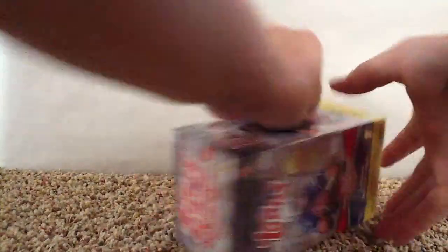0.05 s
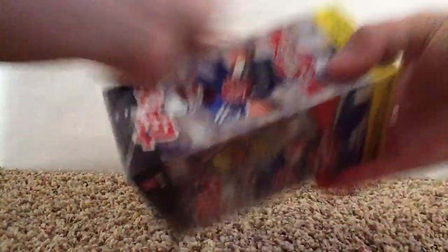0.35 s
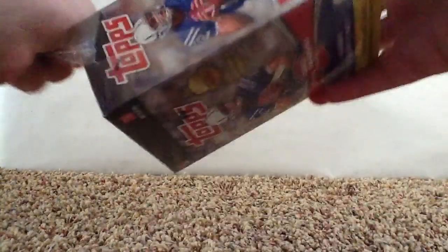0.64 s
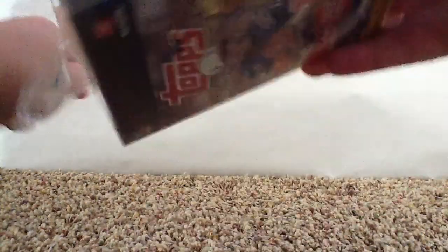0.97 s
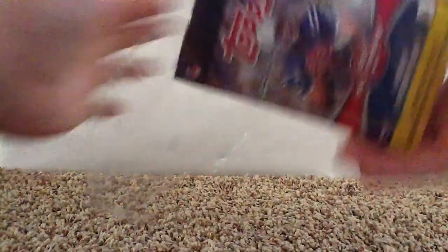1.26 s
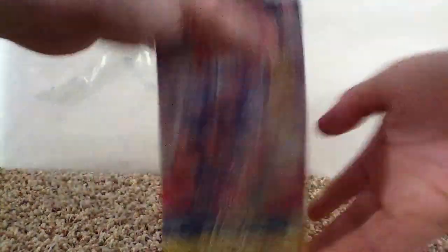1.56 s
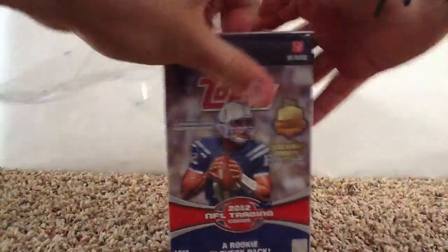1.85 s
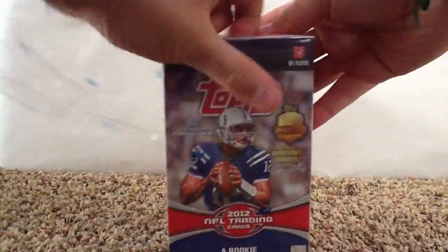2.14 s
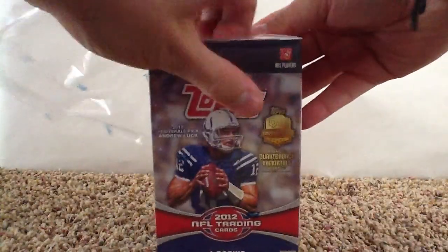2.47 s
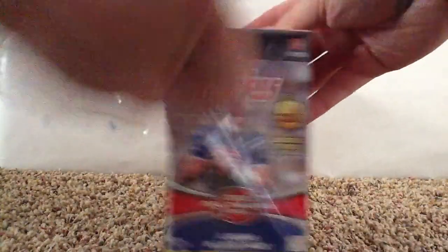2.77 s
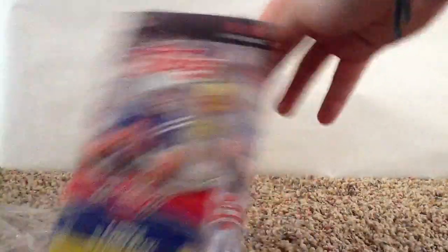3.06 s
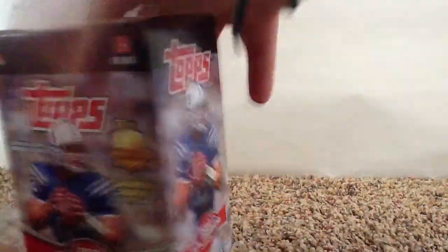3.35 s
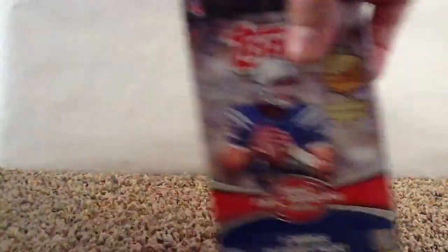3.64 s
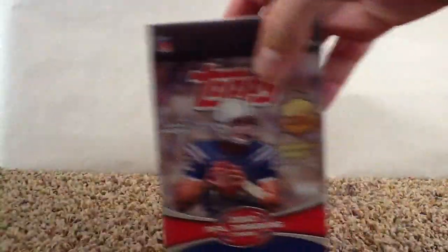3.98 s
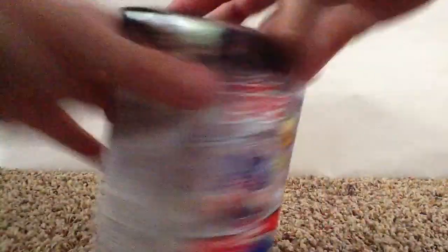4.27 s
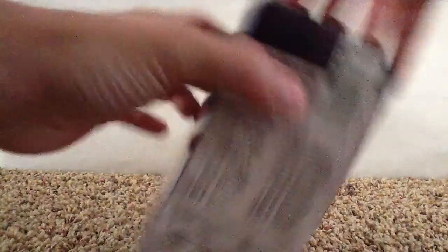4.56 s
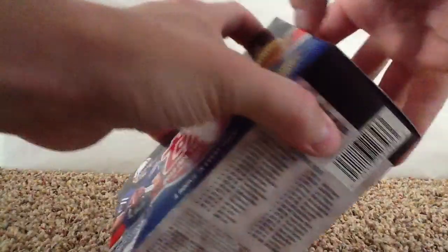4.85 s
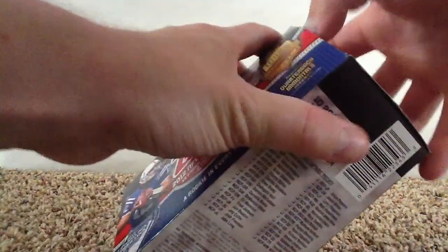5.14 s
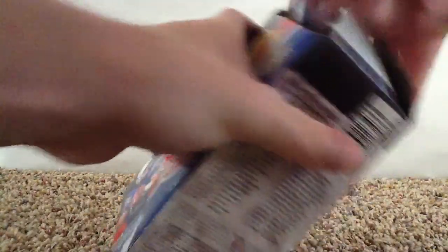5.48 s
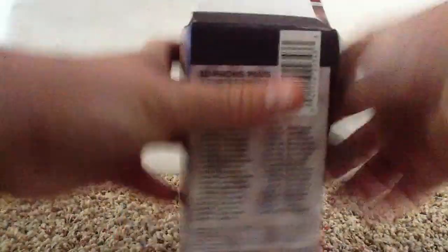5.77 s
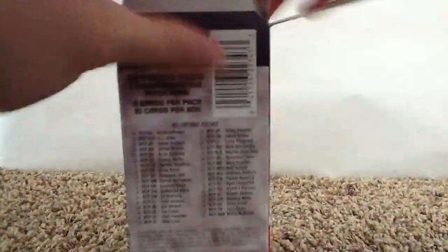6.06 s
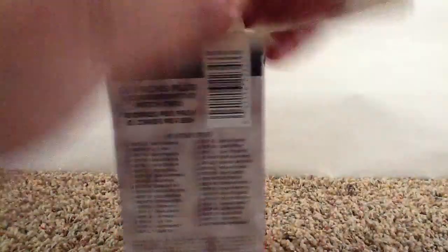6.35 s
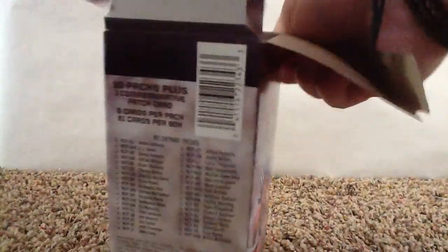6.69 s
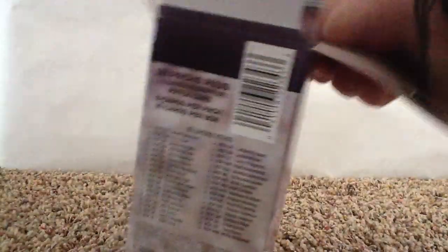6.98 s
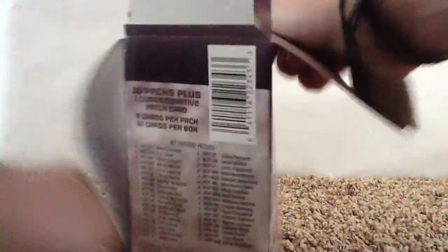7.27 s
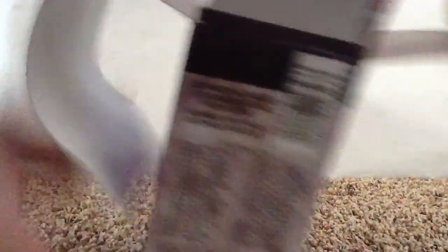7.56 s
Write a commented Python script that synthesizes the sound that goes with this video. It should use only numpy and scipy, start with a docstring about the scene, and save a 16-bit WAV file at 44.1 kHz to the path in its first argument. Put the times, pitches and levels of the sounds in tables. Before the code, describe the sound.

In a quiet carpeted room, thin plastic wrap crackles and snaps right beside the microphone as it is stripped from a box and crumpled, with fingers bumping the hollow sides. The second half changes to dry cardboard sounds: rasping scrapes, small creaks, taps and a few sharp, short rips as the lid is worked open. A faint low room rumble lies underneath.

```python
"""Shrink wrap snaps and crinkles right at a small microphone as hands strip it from a box of card packs.
From about four seconds on they pry and tear the lid open: fingers and flaps scrape and creak on the card.
The film sounds as its facets buckle, the card as it sticks and slips; tugs and taps knock the hollow box.
Behind it all, a small carpeted room answers faintly over its own low rumble."""
import sys
import numpy as np
from scipy import signal
from scipy.fft import rfft, irfft
from scipy.io import wavfile
from scipy.ndimage import uniform_filter1d

SR = 44100
rng = np.random.default_rng(int(sys.argv[2]) if len(sys.argv) > 2 else 0)


def wav_record(signal):
    """Record a signal, one row per channel, as 16-bit PCM in the file named by sys.argv[1]."""
    frames = np.transpose(np.atleast_2d(signal))
    bounded = np.clip(frames, -1, 1)
    # unit amplitude maps onto the largest positive 16-bit level
    quanta = np.round(bounded * 32767).astype(np.int16)
    wavfile.write(sys.argv[1], SR, quanta)


N = 336042
TIME = np.arange(N) / SR
MILLISECOND = SR / 1000  # in samples


def amp(db):
    """Decibels to gain."""
    return 10 ** (np.asarray(db) / 20)


def unit_rms(x):
    """Scales to rms 1."""
    return x / np.sqrt(np.mean(x ** 2) + 1e-20)


def unit_energy(x):
    """Scales to energy 1."""
    return x / np.sqrt(np.sum(x ** 2) + 1e-20)


def curve_at(points, hz):
    """Reads (Hz, value) points on a log-frequency axis."""
    point_hz, value = np.transpose(points)
    return np.interp(np.log(hz + 1), np.log(point_hz + 1), value)


def coloured(x, spectrum):
    """Filters a sound by a curve of (Hz, dB) points."""
    hz = np.fft.rfftfreq(len(x), 1 / SR)
    return irfft(rfft(x) * amp(curve_at(spectrum, hz)), len(x))


def cut(x, hz, side, order=2):
    """Causal low-pass or high-pass."""
    return signal.sosfilt(signal.butter(order, min(hz, SR / 2 - 10), side, fs=SR, output="sos"), x)


def add(mix, start_s, sound):
    """Lays a sound into the mix at a time."""
    part = mix[max(round(start_s * SR), 0):][:len(sound)]
    part += sound[:len(part)]


def room_tone(level_db=-55):
    """The room's steady low rumble, far behind the hands."""
    # Each row: frequency in Hz, relative level in dB.
    tone_spectrum = [(65, -43), (110, -8.5), (170, -0.5), (235, 2), (340, -5.5), (600, -21.5), (1300, -20),
                     (3000, -22.5), (8000, -26.5), (15500, -30)]
    return amp(level_db) * unit_rms(coloured(rng.standard_normal(N), tone_spectrum))


def room_reflections(x, delay_s=0.012, wet_db=-15, dull_hz=4200, taps_per_s=3000):
    """Sparse reflections from nearby walls and furniture, each band dying at its own speed."""
    # The room's decay. Each row: frequency in Hz, seconds to fall 60 dB.
    decay_times = [(150, 0.27), (500, 0.13), (1500, 0.1), (4000, 0.24), (12000, 0.13)]
    taps = rng.choice([-1., 1.], SR // 2) * (rng.random(SR // 2) < taps_per_s / SR)
    hz, t, bands = signal.stft(taps, SR, nperseg=256)
    decay = np.exp(-np.log(1000) * t / curve_at(decay_times, hz)[:, None])
    tail = signal.istft(bands * decay, SR, nperseg=256)[1]
    out = np.zeros(N)
    add(out, delay_s, signal.oaconvolve(x, cut(unit_energy(tail), dull_hz, "low", order=1)))
    return amp(wet_db) * out


def slips(per_s, spread_db):
    """A random train of tiny stick-slip releases; a positive spread makes a few much larger."""
    size = amp(spread_db * np.minimum(rng.exponential(1, N), 3.5))
    return size * rng.choice([-1, 1], N) * (rng.random(N) < per_s / SR)


def resonate(x, hz, width_hz):
    """A resonance that follows a pitch curve."""
    turn = np.exp(2j * np.pi * np.cumsum(hz) / SR)
    pole = np.exp(-np.pi * width_hz / SR)
    return 2 * (turn * signal.lfilter([1 - pole], [1, -pole], x / turn)).real


def card_creaks(sharpness=3.9, hiss_db=-6, settle_s=0.15, sag=0.12, edge_s=0.012, fade_db=-4):
    """Skin or a flap sticks and slips on glossy card: short creaks sag, long ones hold a thin note."""
    # Each row: start in seconds, length in seconds, the card's resonance in Hz, level in dB.
    creak_events = [(0.363, 0.0098, 1680, -34), (1.48, 0.1, 3550, -58), (3.967, 0.29, 3260, -56),
                    (3.976, 0.13, 3970, -60), (3.898, 0.49, 2370, -63.5), (5.411, 0.055, 606, -39.5),
                    (5.466, 0.072, 703, -36.5), (5.675, 0.026, 910, -42.5), (5.69, 0.046, 670, -37),
                    (5.775, 0.019, 2960, -32.5), (6.395, 0.028, 340, -39), (6.462, 0.014, 2920, -42.5),
                    (6.623, 0.23, 7000, -61), (6.783, 0.014, 2130, -37.5), (6.842, 0.016, 3600, -39),
                    (7.267, 0.031, 1720, -43), (7.341, 0.025, 1710, -40.5), (7.545, 0.015, 6240, -43.5)]
    out = np.zeros(N)
    drive = unit_rms(slips(per_s=1500, spread_db=-3.5)) + amp(hiss_db) * rng.standard_normal(N)
    for start, length, hz, db in creak_events:
        ring = drive[round(start * SR):][:round(length * SR)]
        t = TIME[:len(ring)]
        pitch = hz * (1 + sag * np.exp(-length / settle_s) * (0.5 - t / length))
        for _ in range(2):
            ring = resonate(ring, pitch, width_hz=hz / sharpness / (1 + length / settle_s))
        pressure = np.clip(np.minimum(t, length - t) / edge_s, 0, 1) * amp(fade_db * t / length)
        add(out, start, amp(db) * unit_rms(ring * pressure))
    return out


def box_ring(centre_hz, spill_db, octaves=0.62, grip_detune=0.042):
    """A blow rings the box's modes near its centre and spills into the rest; the grip detunes them."""
    # Panels and air space. Each row: frequency in Hz, relative level in dB, seconds to fall 60 dB.
    box_modes = [(141.5, -6, 0.15), (178, -2.5, 0.064), (222, -5.5, 0.1), (270.5, -3, 0.05),
                 (331, -2.5, 0.04), (467.4, -3, 0.039), (565, 3.5, 0.019), (716, -1.5, 0.028),
                 (808, 1, 0.028), (932, 3, 0.023), (1430, 9, 0.0086), (1620, 6.5, 0.0096), (1907, 13, 0.01)]
    hz, db, t60 = np.transpose(box_modes)[:, :, None]
    t = np.arange(4096) / SR
    hz = hz * np.exp(grip_detune * rng.standard_normal(hz.shape))
    reach = 1 / (1 + (np.log2(hz / centre_hz) / octaves) ** 4) + amp(spill_db)
    weight = amp(db) * reach * rng.choice([-1, 1], hz.shape)
    modes = weight * np.sin(2 * np.pi * hz * t) * np.exp(-np.log(1000) * t / t60)
    return unit_energy(modes.sum(0))


def crease(hz, flutter_db=-2, flutter_s=0.0053, bounce_s=0.0023, bounce_gain=0.78):
    """One facet flips: a few cycles of ringing, a flutter of the sheet, a bounce off the box."""
    t = np.arange(512) / SR
    cycles = rng.uniform(0.3, 0.8)
    flip = np.sin(2 * np.pi * hz * t) * t * np.exp(-t * hz / cycles)
    sheet = cut(cut(rng.standard_normal(len(t)), 0.11 * hz, "high"), 1.56 * hz, "low", order=1)
    sound = unit_energy(flip) + amp(flutter_db) * unit_energy(sheet * np.exp(-t / flutter_s))
    bounce = np.interp(t - bounce_s * rng.uniform(0.6, 1.4), t, sound, left=0)
    return unit_energy(sound + bounce_gain * bounce)


def flexing(x, depth_db, size=5):
    """A bending sheet shifts its resonances, in patches about 400 Hz wide and 30 ms long."""
    bands = signal.stft(x, SR, nperseg=512)[2]
    patches = uniform_filter1d(rng.standard_normal(bands.shape), size, axis=0)
    patches = uniform_filter1d(patches, size, axis=1)
    return signal.istft(bands * amp(depth_db * unit_rms(patches)), SR, nperseg=512)[1][:N]


def stroke_gain(strokes, levels_db, rest_db, attack_share, sag_db, release_s):
    """Each stroke rises, sags to its level while the hand moves, then dies away to the resting grip."""
    held = (TIME >= strokes[0][0]) & (TIME <= strokes[-1][0] + strokes[-1][1])
    power = amp(rest_db) ** 2 * held
    for (start, length, *_), db in zip(strokes, levels_db):
        t = TIME[round(start * SR):][:round(length * SR) + SR // 4] - start
        progress = np.clip(t / length, 0, 1)
        rise = np.minimum(progress / attack_share, 1)
        fall = np.exp(-np.maximum(t - length, 0) / release_s)
        add(power, start, (rise * fall * amp(db + sag_db * (1 - progress))) ** 2)
    return np.sqrt(power)


def friction(strokes, spectrum, slips_per_s, spread_db, hiss_db, clump_db, grip_db,
             bumps_per_s, lowest_hz, rumble_trim_db, grip_rumble_db,
             split_hz=4500, skin_hz=1100, pitches=12, **shape):
    """Slips on a moving surface tick in many pitches over a hiss, while soft fingers bump the box."""
    level_db, treble_db, rumble_db = np.transpose(strokes)[2:]
    ticks, bumps = np.zeros(N), np.zeros(N)
    for tick_hz, box_hz in zip(np.geomspace(2500, 12000, pitches), np.geomspace(lowest_hz, 900, pitches)):
        releases = slips(slips_per_s / pitches, spread_db)
        ticks += signal.oaconvolve(releases, crease(tick_hz, flutter_db=1, flutter_s=0.0007))[:N]
        nudges = slips(bumps_per_s / pitches, spread_db=3.5)
        bumps += signal.oaconvolve(nudges, box_ring(box_hz, spill_db=-26))[:N]
    # the grip catches and lets go, so the slips come in clumps
    clumps = amp(clump_db * unit_rms(cut(rng.standard_normal(N), 55, "low")))
    surface = clumps * coloured(unit_rms(ticks) + amp(hiss_db) * rng.standard_normal(N), spectrum)
    dull = unit_rms(flexing(cut(surface, split_hz, "low", order=3), depth_db=3.0))
    bright = unit_rms(cut(surface, split_hz, "high", order=3))  # a faster, lighter stroke has more
    rumble = unit_rms(clumps * cut(bumps, skin_hz, "low"))
    return (dull * stroke_gain(strokes, level_db, grip_db, **shape)
            + bright * stroke_gain(strokes, level_db + treble_db, grip_db, **shape)
            + rumble * stroke_gain(strokes, rumble_db, grip_rumble_db, **shape) * amp(rumble_trim_db))


def card_scrape():
    """Fingers and flaps rub and tear the cardboard: dense slips in a rasping hiss."""
    # Each row: start and length in seconds, scrape in dB, treble in dB above that, relative rumble in dB.
    card_strokes = [(3.915, 0.017, -47.5, 0, -43.5), (3.94, 0.28, -62, 1.5, -67),
                    (4.19, 0.23, -54, 2, -45.5), (4.381, 0.021, -40, -15, -36),
                    (4.44, 0.25, -54.5, -2, -43.5), (4.71, 0.11, -64, 0, -44.5),
                    (5.014, 0.0097, -53, 1, -40), (5.127, 0.027, -45.5, -7.5, -40),
                    (5.26, 0.099, -52, -5.5, -41.5), (5.345, 0.11, -42, -5, -41),
                    (5.465, 0.051, -35.5, 4.5, -37), (5.518, 0.0058, -31.5, 3, -25),
                    (5.533, 0.017, -28.5, 0, -28), (5.59, 0.15, -48, -2.5, -45),
                    (5.762, 0.054, -40.5, -2, -41), (5.83, 0.16, -56.5, 0, -54), (6.06, .25, -55, 2, -55),
                    (6.39, 0.091, -53.5, 0, -44.5), (6.46, 0.064, -51.5, -2.5, -47.5),
                    (6.52, 0.94, -65, 1.5, -79), (6.668, 0.06, -41, -4, -40),
                    (6.765, 0.092, -44.5, 3.5, -44), (6.836, 0.019, -38, 4.5, -35),
                    (7.043, 0.011, -43.5, -5, -39), (7.166, 0.023, -29.5, -7.5, -25.5),
                    (7.25, .18, -44, -1, -39), (7.475, 0.065, -52, -2, -56), (7.537, 0.0099, -50, 6, -43.5)]
    # The colour of scraped card. Each row: frequency in Hz, relative level in dB.
    card_spectrum = [(590, -5), (1000, -3), (1160, 2), (1620, -2), (1940, 1), (2620, -4), (3200, -7),
                     (3800, -5), (4700, -11.5), (7300, -12), (14300, -16.5), (15500, -19.5)]
    return friction(card_strokes, card_spectrum, slips_per_s=1700, spread_db=5.0, hiss_db=3.0,
                    clump_db=2.0, grip_db=-78,
                    bumps_per_s=1500, lowest_hz=225, rumble_trim_db=-4.0, grip_rumble_db=-55.5,
                    attack_share=0.1, sag_db=1, release_s=0.02)


def film_rustle():
    """Pulled and crumpled, the film draws taut quickly, then relaxes in a fine crackle."""
    # Each row: start and length in seconds, rustle in dB, treble in dB above that, relative rumble in dB.
    film_strokes = [(0.0, 0.052, -47.5, 1, -37.5), (0.07, 0.24, -60.5, 0, -52),
                    (0.143, 0.029, -45, 0.5, -40), (0.202, 0.0043, -48, 15, -32),
                    (0.255, 0.13, -54, 4, -53), (0.335, 0.11, -41, -4, -42),
                    (0.458, 0.045, -37.5, -7.5, -33), (0.5, 0.057, -57, -5, -45),
                    (0.862, 0.035, -34, 4, -34), (0.93, 0.054, -53, -11, -50),
                    (1.084, 0.057, -48, 0.5, -48), (1.165, 0.008, -56, 6, -48), (1.25, 2.65, -62.5, 1, -63),
                    (1.3, 0.04, -48.5, 2, -44), (1.367, 0.015, -46, -11, -35.5),
                    (1.39, 0.12, -50.5, -4, -49), (1.5, 0.41, -58.5, -3, -49.5),
                    (1.715, 0.23, -51.5, 0.5, -45), (1.92, 0.17, -46.5, -1, -44),
                    (2.09, 0.083, -62, 4, -46), (2.235, 0.12, -51, 1.5, -45), (2.395, 0.13, -50, -4, -44.5),
                    (2.555, 0.26, -49, 2.5, -48), (2.71, 0.16, -49.5, 8, -38.5),
                    (2.848, 0.089, -38, 2, -31.5), (2.93, 0.27, -45, 3, -41), (3.29, 0.32, -46, -1, -44),
                    (3.44, 0.14, -43.5, 4.5, -47), (3.63, 0.29, -62.5, 2, -54)]
    # The colour of rustling film. Each row: frequency in Hz, relative level in dB.
    film_spectrum = [(590, -33), (1050, 6.5), (1900, 3), (2900, -0.5), (3900, 2), (5000, -3), (7000, 4.5),
                     (12000, 1.5), (15500, 4)]
    return friction(film_strokes, film_spectrum, slips_per_s=480, spread_db=3.9, hiss_db=-11,
                    clump_db=1.5, grip_db=-102,
                    bumps_per_s=440, lowest_hz=175, rumble_trim_db=-2.0, grip_rumble_db=-63.5,
                    attack_share=0.11, sag_db=2.5, release_s=0.017)


def blows(per_tug=3):
    """Every blow on the box: single taps and flap pops, and the judder of a tugged seam giving way."""
    # Each row: start in seconds, ring level in dB over 1 ms, centre in Hz, crack in dB above the ring.
    single_taps = [(0.2105, -17, 1240, -8), (0.3676, -19, 814, -18), (0.4688, -6.5, 546, -19),
                   (0.7797, -18.5, 635, -0.5), (1.367, -28.5, 610, -12), (1.3823, -31.5, 306, -3),
                   (1.5755, -26.5, 220, -24), (1.6295, -27, 546, -13), (1.7257, -15.5, 750, -5),
                   (2.041, -20, 520, -6), (2.174, -28, 380, -20), (2.65, -22.5, 456, -20),
                   (2.707, -26.5, 430, -7), (3.157, -32, 670, -8), (3.4078, -24.5, 296, -6),
                   (3.4546, -22.5, 1420, -20), (3.571, -25.5, 1340, -24), (4.3264, -27.5, 750, -23),
                   (4.468, -24.5, 454, -15.5), (4.6197, -29, 775, -2), (4.8135, -23.5, 710, -9),
                   (4.872, -37, 660, -34), (4.925, -41, 960, -16), (5.016, -24.5, 270, -28),
                   (5.129, -29, 402, -20), (5.136, -26.5, 850, -20), (5.3038, -23.5, 634, -6),
                   (5.4618, -21.5, 950, 2), (5.555, -12.5, 323, -18), (5.745, -38, 900, 9),
                   (5.8019, -18, 600, -4.5), (6.118, -31.5, 705, -12), (6.1764, -31.5, 650, -6),
                   (6.2633, -30.5, 660, -19), (6.406, -23, 343, -25), (6.686, -24, 300, -11),
                   (6.698, -19, 920, -9.5), (6.724, -26, 1160, -16), (7.046, -30, 594, -1),
                   (7.06, -31.5, 785, -3), (7.174, -17, 240, -24), (7.215, -22, 540, -12),
                   (7.2981, -16, 786, -10.5), (7.385, -22, 960, -4), (7.407, -27, 1420, 0),
                   (7.4226, -13.5, 710, -18), (7.6153, -17, 350, -8)]
    # Each row: start and length in seconds, then each blow's level, centre and crack as for a tap.
    seam_tugs = [(0.862, 0.0092, -23, 537, -6), (4.548, 0.017, -28.5, 704, -18),
                 (4.658, 0.019, -35, 660, -24), (2.847, 0.008, -15.5, 626, -3),
                 (4.3935, 0.019, -16.5, 580, -19.5), (5.5155, 0.005, -16, 510, -3.5),
                 (5.5532, 0.0046, -10, 715, -2), (7.168, 0.0095, -9.5, 1090, -9)]
    judders = [(start + delay, db, hz, crack_db) for start, length, db, hz, crack_db in seam_tugs
               for delay in np.linspace(0, length, per_tug)]
    return list(single_taps) + judders


def box_knocks(contact_s=0.00043, crack_s=0.0025, crack_rise_s=0.00022, push_db=-15, push_s=0.0011,
               drag_s=0.0034):
    """Each blow rings the hollow box, cracks its fibres and pushes out a little air."""
    out, t = np.zeros(N), np.arange(4096) / SR
    push = unit_energy((1 - t / push_s) * np.exp(-t / push_s))
    for start, db, hz, crack_db in blows():
        fibres = rng.standard_normal(len(t)) * np.exp(-t / crack_s) * (1 - np.exp(-t / crack_rise_s))
        fibres = cut(fibres, 8600, "low")  # card damps the top treble
        crack = unit_energy(cut(cut(fibres, 1300, "high"), 3100, "low", order=1))
        ring = box_ring(hz, spill_db=-22.5) * (1 - np.exp(-t / contact_s))
        drag = rng.standard_normal(len(t)) * np.sqrt(t) * np.exp(-t / drag_s)
        dragged_ring = unit_energy(signal.fftconvolve(ring, drag)[:len(t)])
        drag_db = -13 - 0.44 * db  # a light finger drags as it lands, a hard blow rings clean
        ring = unit_energy(ring + amp(drag_db) * dragged_ring)
        blow = ring + amp(crack_db) * crack + amp(push_db) * push
        add(out, start, amp(db) * np.sqrt(MILLISECOND) * blow)
    return out


def snap(hz, ring_s=0.001, rise_s=0.00017, flutter_cycles=4.5, tick_s=0.004, tick_db=-7):
    """A facet of film buckles: it rings on two close notes, flutters around its pitch and ticks."""
    # The facet's two notes, as multiples of its pitch.
    note_ratios = [.85, 1.15]
    t = np.arange(700) / SR
    onset = 1 - np.exp(-t / rise_s)
    notes = np.outer(note_ratios, hz) * rng.uniform(0.96, 1.04, (len(note_ratios), 1))
    ring = np.sin(2 * np.pi * (notes * t + rng.random(notes.shape))).sum(0)
    ring = unit_energy(ring * onset * np.exp(-t / ring_s))
    ring_db = -4.5 - 6 * np.log2(hz / 5000)  # a large, low facet rings most
    flutter, tick = rng.standard_normal((2, len(t))) * onset
    flutter = cut(cut(flutter * np.exp(-t * hz / flutter_cycles), 0.52 * hz, "high"), 1.6 * hz, "low")
    tick = cut(tick * np.exp(-t / tick_s), 600, "high", order=1)
    return unit_energy(amp(ring_db) * ring + unit_energy(flutter) + amp(tick_db) * unit_energy(tick))


def film_snaps(trim_db=-2.0, follow_db=-15, follow_s=0.0065, stray_octaves=0.55, neighbours=2):
    """Creases give way as the wrap is torn and crushed, each with smaller ones beside it."""
    # Each row: start in seconds, relative level in dB, pitch in Hz.
    snap_events = [(0.0138, -21, 4300), (0.0204, -15.5, 5410), (0.0273, -16.5, 7200), (0.051, -23.5, 7340),
                   (0.1411, -18, 5700), (0.196, -31, 3800), (0.2025, -9, 5140), (0.209, -11, 4830),
                   (.2629, -30, 8000), (0.274, -28.5, 4200), (0.3334, -18, 4450), (0.367, -19.5, 2110),
                   (.3826, -22, 7100), (0.43, -27, 4680), (0.4672, -8, 7000), (0.4943, -25, 3920),
                   (0.71, -31, 8900), (0.7796, -11, 3660), (0.8616, -20.5, 4200), (0.87, -24, 3770),
                   (.8736, -20, 7460), (0.9566, -27, 7200), (.9738, -33, 8000), (.9984, -38, 6300),
                   (1.099, -29.5, 6340), (1.11, -28.5, 5600), (1.137, -32, 6040), (1.3087, -27.5, 7160),
                   (1.324, -30, 4900), (1.3431, -28, 4170), (1.367, -30, 3950), (1.3858, -24, 7940),
                   (1.399, -28, 4530), (1.4133, -23, 9200), (1.429, -24.5, 5150), (1.446, -25.5, 10000),
                   (1.463, -26.5, 7200), (1.473, -30.5, 6400), (1.486, -32, 6500), (1.553, -31, 5600),
                   (1.56, -30, 7100), (1.7271, -11.5, 7900), (1.79, -25, 7300), (1.8354, -34, 5500),
                   (1.9212, -24.5, 8500), (1.9296, -25, 6300), (1.9552, -19, 7250), (1.968, -27, 4630),
                   (1.995, -19, 6300), (2.0206, -19.5, 8650), (2.0379, -23, 6800), (2.1413, -31, 7400),
                   (2.151, -21.5, 6700), (2.1739, -29, 9400), (2.241, -25, 4480), (2.247, -28.5, 8200),
                   (2.276, -24.5, 8340), (2.4847, -25.5, 7900), (2.5863, -38, 8500), (2.6, -29, 9900),
                   (2.6087, -16, 5580), (2.6692, -26, 4600), (2.6945, -20, 8300), (2.708, -13.5, 4330),
                   (2.715, -18.5, 6540), (2.7606, -26, 5800), (2.768, -19.5, 7800), (2.7798, -15, 3360),
                   (2.7863, -19, 3320), (2.7953, -10.5, 3220), (2.8085, -29, 6300), (2.8257, -14, 6530),
                   (2.845, -5, 4350), (2.8692, -16, 4230), (2.8844, -16, 5100), (2.893, -12.5, 7000),
                   (2.922, -14, 6900), (2.9253, -20, 8300), (2.9432, -27, 5800), (2.951, -15.5, 6000),
                   (2.997, -28, 8340), (3.007, -27, 7000), (3.016, -22, 9000), (3.025, -21, 7600),
                   (3.0311, -20.5, 9000), (3.0415, -26, 7500), (3.0578, -32, 7100), (3.086, -24, 6100),
                   (3.0962, -27, 7900), (3.139, -31, 7300), (3.157, -29, 6200), (3.166, -32, 9300),
                   (3.1885, -29, 8400), (3.2091, -27, 4480), (3.28, -21, 7000), (3.3217, -28, 11000),
                   (3.3428, -27.5, 7640), (3.357, -33, 4800), (3.398, -22.5, 11700), (3.41, -27, 7660),
                   (3.419, -28, 7500), (3.468, -16.5, 8600), (3.488, -26, 7700), (3.493, -27, 6400),
                   (3.541, -34, 9100), (3.571, -20.5, 8200), (3.6543, -29.5, 4760), (3.83, -23.5, 10900)]
    out = np.zeros(N)
    for start, db, hz in snap_events:
        size = amp(db + trim_db) * np.sqrt(MILLISECOND)
        add(out, start, size * snap(hz))
        offsets_s = follow_s * rng.uniform(-0.5, 1, neighbours)
        shifts = stray_octaves * rng.uniform(-0.36, 1, neighbours)
        for offset, octaves in zip(offsets_s, shifts):
            add(out, start + offset, size * amp(follow_db) * crease(hz * 2 ** octaves))
    return out


def scene():
    """Film, card and fingers close up, the room faint behind them, in mono."""
    near = film_rustle() + card_scrape() + film_snaps() + box_knocks() + card_creaks()
    background = room_tone()
    return (near + room_reflections(near) + background)[None]


def record(dry):
    """A small microphone close to the hands: soft overload, thin bass, no top treble."""
    thinned = cut(np.tanh(dry), 118.0, "high", order=3)
    band_limit = signal.firwin(511, 15650, window=("kaiser", 9), fs=SR)
    return signal.oaconvolve(thinned, band_limit[None], "same")


dry = scene()
out = record(dry)
wav_record(out)
```